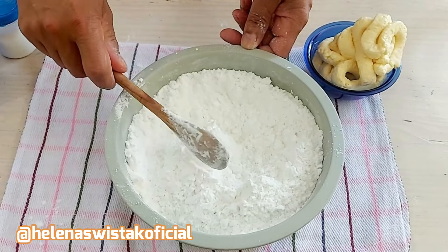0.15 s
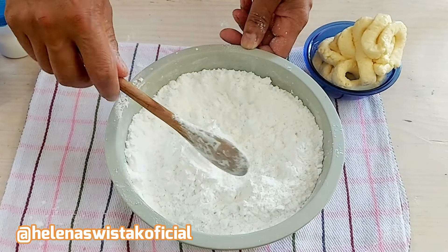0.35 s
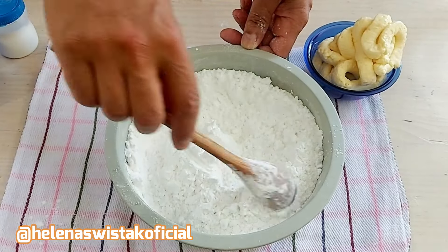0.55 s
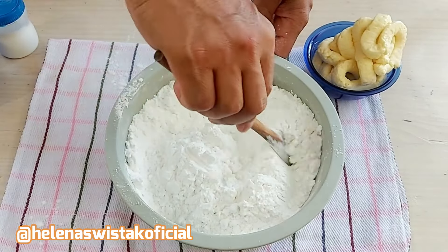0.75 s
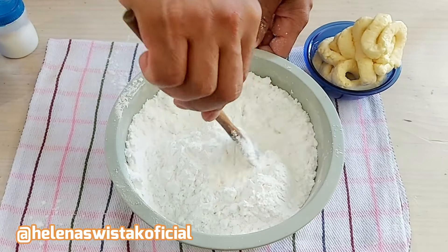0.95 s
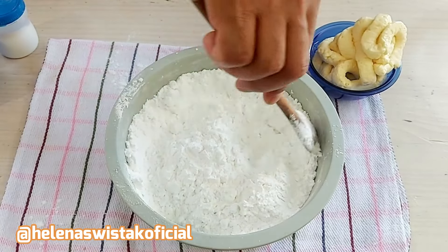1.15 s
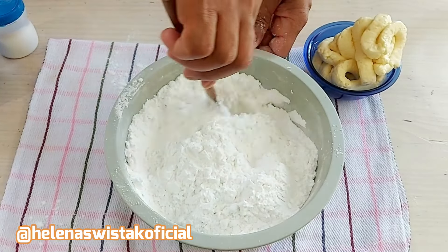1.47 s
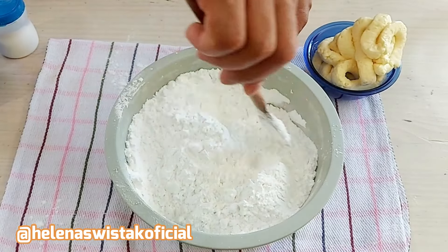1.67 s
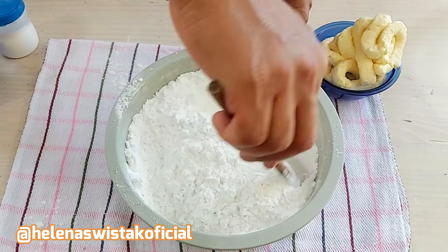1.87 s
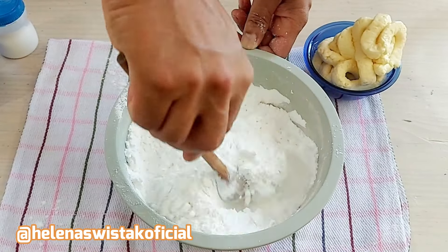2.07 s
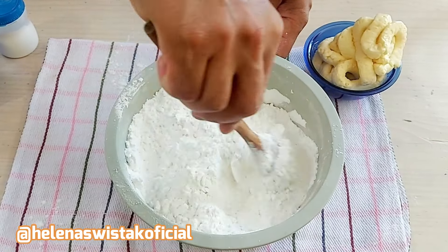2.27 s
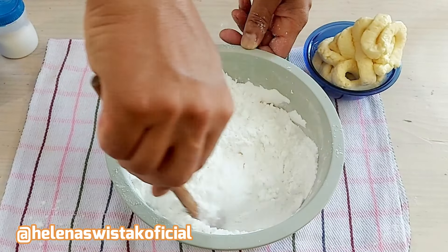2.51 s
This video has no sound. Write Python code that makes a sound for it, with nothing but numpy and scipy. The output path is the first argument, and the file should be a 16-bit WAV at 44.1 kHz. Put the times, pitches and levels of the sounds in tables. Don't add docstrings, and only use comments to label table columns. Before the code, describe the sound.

A wooden spoon stirs flour and sugar in a plastic bowl: two loud dull knocks first, then short gritty, hissing strokes with rim ticks and soft bumps, recorded close in a small hard kitchen with low rumble.

```python
import sys
import numpy as np
from scipy import signal
from scipy.fft import rfft, irfft
from scipy.io import wavfile
from scipy.ndimage import uniform_filter1d, map_coordinates

SR = 44100
rng = np.random.default_rng(int(sys.argv[2]) if len(sys.argv) > 2 else 0)


def transcribe(u):
    v = np.clip(np.atleast_2d(u).T, -1, 1)
    q = np.round(v * 32767).astype(np.int16)
    wavfile.write(sys.argv[1], SR, q)


def convert_level_to_amplitude(level_db):
    exponent = np.asarray(level_db, float) / 20
    return 10 ** exponent


N = 116865
T = np.arange(N) / SR
LEAD = 4410
SIDES = np.array([[1], [-1]])


def unit(x):
    return x / np.sqrt(np.mean(x ** 2))


def colour(x, table):
    hz, db = np.array(table, float).T
    n = x.shape[-1]
    f = np.arange(n // 2 + 1) * SR / n + 1
    points_hz = np.r_[hz[0] / 4, hz, hz[-1] * 2]
    points_db = np.r_[db[0] - 40, db, db[-1] - 30]
    gain_db = np.interp(np.log(f), np.log(points_hz), points_db)
    return irfft(rfft(x) * convert_level_to_amplitude(gain_db), n)


def walk(rate_hz):
    k = int(SR / rate_hz)
    steps = np.repeat(rng.standard_normal(N // k + 1), k)
    smooth = uniform_filter1d(uniform_filter1d(steps, k), k)
    return unit(smooth[:N])


def decay(t, t60_s):
    return 1000 ** (-t / t60_s)


def add(track, start_s, x):
    i = max(int(start_s * SR), 0)
    x = x[..., :track.shape[-1] - i]
    track[..., i:i + x.shape[-1]] += x


def pan(db):
    left = convert_level_to_amplitude(db)
    return np.array([[left], [1]]) * 2 / (1 + left)


# freq_hz, level_db, t60_s, pan_db
BODY_MODES = [(150, -5, 0.17, 0.5), (227.9, -4.5, .1, 1), (262, -6.5, 0.074, 0), (394.5, -3, 0.075, 3),
              (492.4, -1, 0.047, 5.5), (594, -5, 0.0087, 2), (898.5, -9.5, 0.022, -1),
              (1250, -13, 0.022, 1), (1340, -2.5, 0.009, -7), (1524, -11, 0.012, -14.5),
              (2300, -15.5, 0.012, -2.5), (2650, -16.5, 0.009, 17.5)]


def body_ring():
    t = np.arange(int(.3 * SR)) / SR
    out = 0
    for hz, db, t60_s, pan_db in BODY_MODES:
        out = out + convert_level_to_amplitude(db) * pan(2 * pan_db) ** .5 * np.sin(2 * np.pi * hz * t) * decay(t, t60_s)
    return out


KNOCK_START_S = [-.03, .1113]
# peak_db, contact_ms
KNOCK_HITS = [
    (9, 0.068),
    (2.5, 0.14),
]
KNOCK_RISE_S = 0.0011


def knocks():
    out = np.zeros((2, N + LEAD))
    body = body_ring()
    t = np.arange(900) / SR
    for start_s, (peak_db, contact_ms) in zip(KNOCK_START_S, KNOCK_HITS):
        push = np.diff(t * np.exp(-1000 * t / contact_ms))
        hit = signal.fftconvolve(body, push[None], axes=1)
        hit *= np.minimum(np.arange(hit.shape[1]) / SR / KNOCK_RISE_S, 1)
        add(out, start_s + LEAD / SR, convert_level_to_amplitude(peak_db) * hit / np.abs(hit).max())
    return out


# time_s, level_db
STROKE_PRESSURE = [
    [(0, -39), (.09, -64), (.2, -48.5), (.26, -43.5), (.34, -50), (.45, -62.5)],
    [(.55, -62), (.59, -46), (.613, -48.5), (.621, -39), (.672, -36), (.682, -55)],
    [(.68, -44), (.69, -47.5), (.698, -42)],
    [(.703, -42.5), (.76, -44.5), (.85, -54), (.89, -63)],
    [(1.17, -68), (1.209, -56), (1.213, -41), (1.232, -39), (1.245, -43), (1.272, -44)],
    [(1.28, -47), (1.31, -49.5), (1.33, -43.5), (1.34, -44.5), (1.41, -56.5), (1.45, -90)],
    [(1.635, -67.5), (1.67, -50.5), (1.73, -50.5), (1.79, -66)],
    [(1.828, -53), (1.89, -47.5), (1.92, -40.5), (1.96, -50), (2.01, -59)],
    [(2.03, -71), (2.065, -50), (2.085, -54), (2.13, -66.5)],
    [(2.43, -62.5), (2.45, -43.5), (2.49, -48.5), (2.505, -36), (2.535, -40), (2.585, -65)],
    [(2.596, -45), (2.65, -52.5)],
]
# powder_db, grit_db, wall_db, roughness_db, pan_db
STROKE_MIX = [(-11, -0.5, -4, -2, 1), (-4, -1.5, -13, 5, 0.5), (-39, -6.5, -1, 1, -2.5),
              (-6, -5.5, -2, 3.5, 1.5), (-2.5, 0.5, -5.5, 0.5, 1), (-6.5, -14, 1, 1, 7.5),
              (0, -8.5, -5.5, 0.5, 2), (-14.5, -8, -11, 3.5, 1), (-19.5, -17, -0.5, 4.5, 2),
              (-8.5, -4, -12, -0.5, 4), (-10.5, -5, -6.5, -3, 7.5)]
GRIT_TILT = [-6, 0, -10.5, -1, -0.5, 5.5, 2.5, -2.5, 12, -1, 0.5]
# freq_hz, level_db
POWDER_TONE = [(300, -41.5), (1200, -10), (3000, -12.5), (8000, -5.5), (12500, 0.5), (16000, -2.5)]
# freq_hz, level_db
GRIT_TONE = [(300, -24.5), (900, -25.5), (1500, -5.5), (2400, 1.5), (3500, 1), (4700, -2.5), (7500, -1),
             (16000, -41)]
# freq_hz, level_db
WALL_TONE = [(100, -29.5), (210, -1.5), (300, -6.5), (450, -6), (750, -5.5), (1100, -7), (1500, -5),
             (3000, -27)]


def strokes():
    shared = rng.standard_normal((3, N))
    apart = rng.standard_normal((2, N))
    size = rng.exponential(size=N)
    cluster = np.clip(walk(260), -2, 1.5)
    powder = unit(colour(rng.standard_normal((2, N)) + shared[0], POWDER_TONE))
    grit_scale = 1 / np.std(colour(shared[2], GRIT_TONE))
    wall_scale = 1 / np.std(colour(shared[2], WALL_TONE))
    out = np.zeros((2, N))
    for curve, mix, tilt_db in zip(STROKE_PRESSURE, STROKE_MIX, GRIT_TILT):
        powder_db, grit_db, wall_db, rough_db, pan_db = mix
        s, db = np.array(curve, float).T
        press_db = np.interp(T, np.r_[s[0] - .006, s, s[-1] + .02], np.r_[-100, db, -100])
        press = convert_level_to_amplitude(press_db)
        crunch = convert_level_to_amplitude(rough_db * (.25 * size + cluster))
        crystals = unit(crunch * (shared[1] + .7 * apart)) * press
        tilted = [(hz, level_db + tilt_db * np.log2(hz / 2000)) for hz, level_db in GRIT_TONE]
        stroke = convert_level_to_amplitude(powder_db) * press * powder
        stroke = stroke + convert_level_to_amplitude(grit_db) * grit_scale * colour(crystals, tilted)
        stroke = stroke + convert_level_to_amplitude(wall_db) * wall_scale * colour(crystals, WALL_TONE)
        out += pan(np.clip(pan_db, -6, 6)) * stroke
    return out


# freq_hz, level_db_per_hz
HUM_TONE = [(25, -17), (62, 19.5), (100, -5.5), (150, 5), (210, -16.5), (380, -6), (600, -40)]
# freq_hz, level_db_per_hz
AIR_TONE = [(200, -21.5), (500, -23), (900, -33.5), (2000, -35.5), (3200, -43.5), (4600, -35.5),
            (9000, -41), (16000, -44)]
HUM_DB, AIR_DB = -52, -62.5


def kitchen():
    mid, side = rng.standard_normal((2, 2, N))
    hum = unit(colour(mid[0] + 0.38 * SIDES * side[0], HUM_TONE))
    air = unit(colour(mid[1] + SIDES * side[1], AIR_TONE))
    return hum * convert_level_to_amplitude(HUM_DB + walk(7.2)) + air * convert_level_to_amplitude(AIR_DB + 0.5 * walk(1.2))


# start_s, length_s, freq_hz, width_hz, level_db
FAR_SQUEAKS = [
    (1.07, .11, 8400, 350, -63),
    (.94, .08, 3500, 500, -68),
    (1.15, .06, 2100, 300, -60),
    (1.99, .07, 4300, 600, -61),
    (2.04, .07, 4900, 900, -60),
    (1.3, .25, 62, 30, -50),
    (2.3, .14, 5500, 4000, -65),
    (-2, 7, 378, 12, -65),
]


def squeaks():
    out = np.zeros((2, N))
    for start_s, length_s, hz, width_hz, db in FAR_SQUEAKS:
        band = signal.butter(2, [hz - width_hz / 2, hz + width_hz / 2], "band", fs=SR)
        swell = np.sin(np.pi * np.clip((T - start_s) / length_s, 0, 1))
        out += convert_level_to_amplitude(db) * swell * unit(signal.lfilter(*band, rng.standard_normal((2, N))))
    return out


# start_s, peak_db, ring_hz,
# crack_db, pan_db
EDGE_TICKS = [(.1114, -25, 3000, -3, 2), (.6179, -13, 2450, -10, 1), (.651, -23, 3500, -22, 2),
              (.6988, -12.5, 2250, -15, 0), (1.2118, -25, 1010, -11, -1), (1.2185, -25, 1010, -8, 1),
              (1.23, -23, 1000, -14, 1), (1.2333, -26, 3000, -18, 1), (1.259, -28, 3000, -22, 1),
              (1.2753, -14, 2150, -19, 2), (1.281, -29, 2900, -26, 2), (1.301, -31, 2350, -26, 2),
              (1.334, -31, 2800, -14, 3), (1.3365, -28, 2700, -10, 3), (1.828, -41, 1300, -14, 1),
              (1.887, -42, 1880, -14, 0), (1.915, -30, 1620, -28, 0), (1.946, -42, 2400, -26, -1),
              (2.073, -44, 4900, -22, 0), (2.448, -42, 2150, -20, -1), (2.471, -39, 1900, -24, 0),
              (2.502, -32, 2650, -24, 2), (2.509, -30, 3050, -20, 2), (2.5235, -29, 2900, -12, 2),
              (2.546, -36, 2400, -26, 2), (2.558, -38, 2400, -30, 2), (2.5958, -31, 2000, -26, 2)]
# multiple_of_ring_hz, level_db, t60_s
WALL_RINGS = [
    (1, 0, .012),
    (1.42, -3, .009),
    (1.85, -9, .006),
]
CRACK_S, SNAP_S, TICK_RISE_S = .0009, .0013, .0004
BOUNCE_S, BOUNCE_DB = .0021, -11


def ticks():
    out = np.zeros((2, N))
    t = np.arange(1300) / SR
    lag = int(BOUNCE_S * SR)
    crack_band = signal.butter(1, [3500, 11000], "band", fs=SR)
    for start_s, peak_db, hz, crack_db, pan_db in EDGE_TICKS:
        chance = rng.standard_normal((3, 1300))
        rings = 0
        for (multiple, db, t60_s), c, p in zip(WALL_RINGS, chance[0], chance[1]):
            ring_hz = hz * multiple * (1 + 0.021 * c)
            wave = np.sin(2 * np.pi * ring_hz * t + .6 * SIDES * p)
            rings = rings + convert_level_to_amplitude(db + 2 * c) * wave * decay(t, t60_s)
        crack = signal.lfilter(*crack_band, chance[0] + chance[1:]) * np.exp(-t / CRACK_S)
        snap_band = signal.butter(2, [hz / 1.3, min(2.1 * hz, 4900)], "band", fs=SR)
        snap = signal.lfilter(*snap_band, chance[0] + .5 * chance[1:]) * np.exp(-t / SNAP_S)
        tick = (.5 * rings + snap + convert_level_to_amplitude(crack_db + 11.5) * crack) * np.minimum(t / TICK_RISE_S, 1)
        tick = tick * convert_level_to_amplitude(-6.5) / np.std(tick.mean(0)[:100])
        bounce = np.pad(tick, ((0, 0), (lag, 0)))[:, :-lag]
        add(out, start_s, convert_level_to_amplitude(peak_db) * pan(pan_db) * (tick + convert_level_to_amplitude(BOUNCE_DB) * bounce))
    return out


# start_s, peak_db, pitch_hz, t60_s
SOFT_BUMPS = [(0.621, -34, 371, 0.055), (.624, -35, 208, 0.069), (.651, -30, 1430, 0.015),
              (.8095, -29, 187, 0.031), (0.8232, -33.5, 164.4, 0.12), (0.844, -37, 960, 0.012),
              (0.852, -32, 180, 0.03), (0.8678, -35.5, 402, 0.027), (0.897, -50, 175, 0.045),
              (1.214, -41, 160, 0.038), (1.231, -34.5, 210, 0.02), (1.2484, -26.5, 900, 0.0035),
              (1.258, -30, 1000, 0.0093), (1.2753, -26.5, 675, 0.016), (1.3175, -31.5, 570, 0.0097),
              (1.342, -34, 596, 0.02), (1.35, -36, 694, 0.017), (1.363, -35, 900, 0.0062),
              (1.397, -32, 1080, 0.0095), (1.399, -33.5, 628, 0.0076), (1.406, -35.5, 720, 0.016),
              (1.945, -37.5, 1550, 0.013), (2.061, -44, 1340, 0.037), (2.077, -42, 1312, 0.049),
              (2.079, -44, 150, 0.14), (2.4305, -47, 1290, .02), (2.462, -44, 1604, .015),
              (2.474, -37, 1460, 0.017), (2.496, -23.5, 1433, 0.014), (2.497, -41.5, 645, 0.035),
              (2.498, -40.5, 390, 0.13), (2.506, -42, 233, 0.035), (2.524, -43.5, 163, 0.075),
              (2.544, -40, 390, 0.018), (2.596, -40, 1268, 0.032), (2.597, -46.5, 220, 0.14),
              (2.607, -43, 1310, .02), (2.625, -42, 1268, .03), (2.64, -38.5, 1230, 0.043)]
BUMP_RISE_CYCLES, BUMP_OVERTONE_DB = 0.34, -8


def bumps():
    out = np.zeros((2, N))
    t = np.arange(SR // 8) / SR
    for start_s, peak_db, hz, t60_s in SOFT_BUMPS:
        c = rng.standard_normal(2)
        note = np.sin(2 * np.pi * hz * t + c[0] * hz / 3000 * SIDES) * decay(t, t60_s)
        overtone = np.sin(2 * np.pi * hz * (2.105 + 0.18 * c[1]) * t) * decay(t, t60_s / 2)
        note = note + convert_level_to_amplitude(BUMP_OVERTONE_DB) * overtone
        note = note * (1 - np.exp(-t * hz / BUMP_RISE_CYCLES))
        add(out, start_s, -convert_level_to_amplitude(peak_db) * note / np.abs(note).max())
    return out


# freq_hz, level_db
TAIL_TONE = [(60, -15.5), (150, -4), (400, -7.5), (800, -4), (1400, -6), (2500, -4), (6000, -8),
             (16000, -17.5)]
ROOM_T60_LOW_S, ROOM_T60_HIGH_S = 0.28, 0.29


def room(x):
    t = np.arange(SR // 2) / SR
    mid, side = rng.standard_normal((2, len(t)))
    wide = signal.lfilter(*signal.butter(2, 520, "high", fs=SR), side)
    noise = mid + 1.245 * SIDES * wide
    low = signal.lfilter(*signal.butter(2, 900, fs=SR), noise)
    tail = low * decay(t, ROOM_T60_LOW_S) + (noise - low) * decay(t, ROOM_T60_HIGH_S)
    tail = colour(tail * np.minimum(t / 0.0085, 1), TAIL_TONE)
    tail = tail / np.sqrt(np.sum(tail ** 2) / 2)
    return signal.fftconvolve(x[None], tail, axes=1)[:, :len(x)]


ROOM_DB, KNOCK_ROOM_DB = -8.5, -9
PORT_LAG_S = 2.5e-5


def scene():
    spoon = strokes() + ticks() + bumps()
    near = knocks()
    spoon_send = np.r_[np.zeros(LEAD), spoon.mean(0)]
    wet = room(convert_level_to_amplitude(KNOCK_ROOM_DB) * near.mean(0) + convert_level_to_amplitude(ROOM_DB) * spoon_send)[:, LEAD:]
    dry = spoon + near[:, LEAD:]
    dry[0] = map_coordinates(dry[0], [np.arange(N) - PORT_LAG_S * SR], mode="nearest")
    return dry + wet + kitchen() + squeaks()


def band_limit(x):
    return signal.sosfilt(signal.butter(12, 16660, fs=SR, output="sos"), x)


LOW_CUT_HZ, TOP_HZ = 75, 15900


def record(dry):
    dry = signal.lfilter(*signal.butter(2, LOW_CUT_HZ, "high", fs=SR), dry)
    dry = signal.sosfilt(signal.ellip(8, .2, 60, TOP_HZ, fs=SR, output="sos"), dry)
    return band_limit(np.clip(dry, -1, 1))


dry = scene()
out = record(dry)
transcribe(out)
```